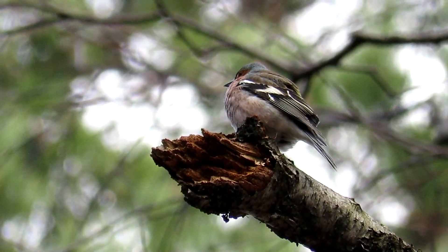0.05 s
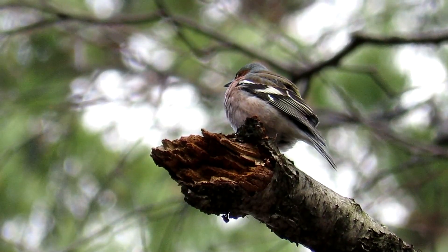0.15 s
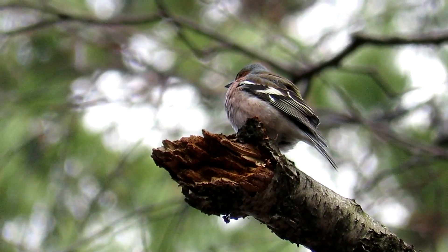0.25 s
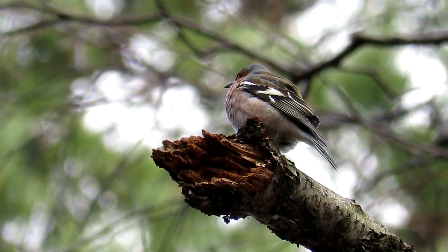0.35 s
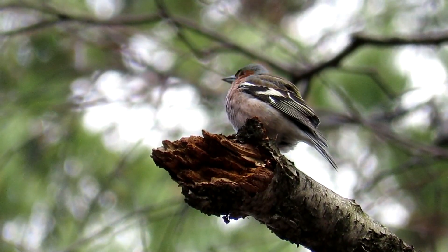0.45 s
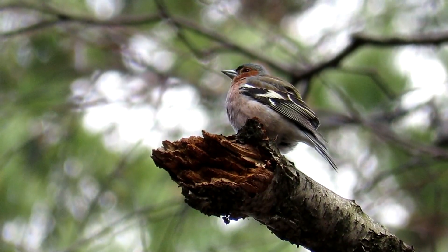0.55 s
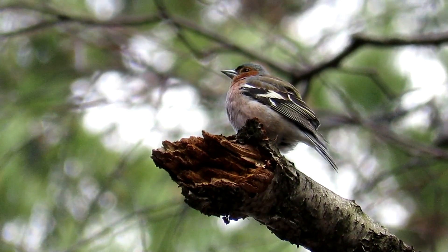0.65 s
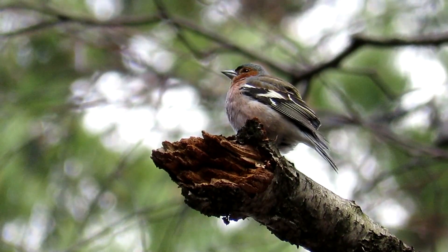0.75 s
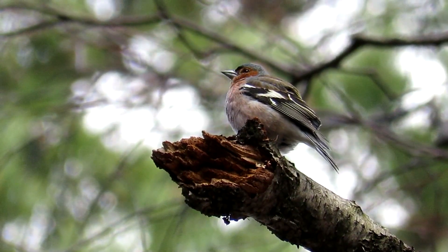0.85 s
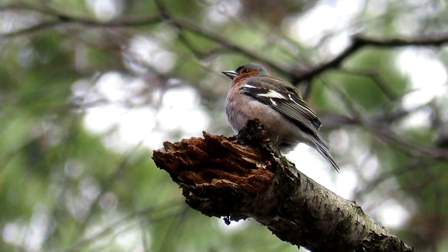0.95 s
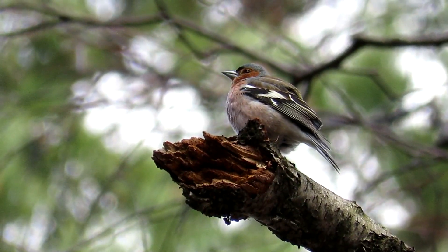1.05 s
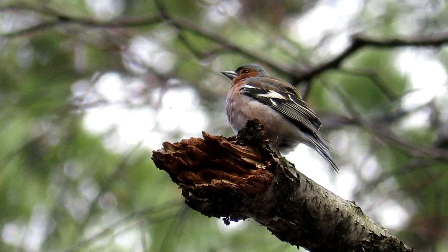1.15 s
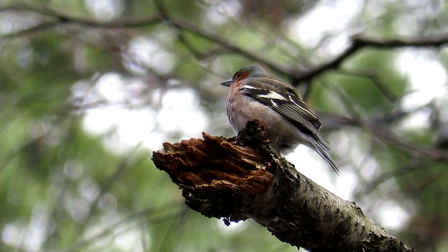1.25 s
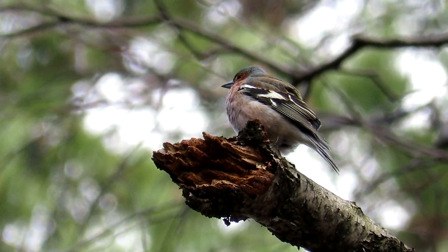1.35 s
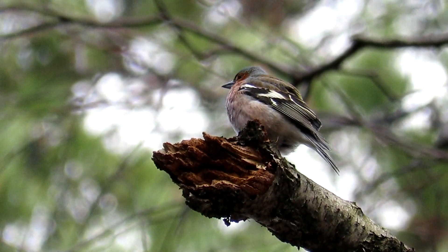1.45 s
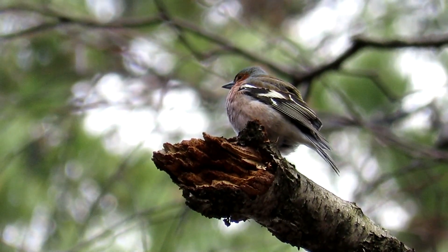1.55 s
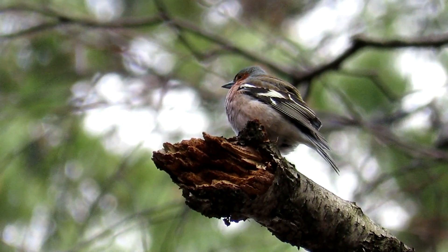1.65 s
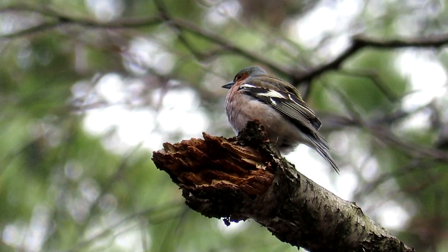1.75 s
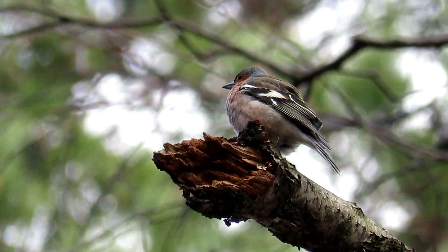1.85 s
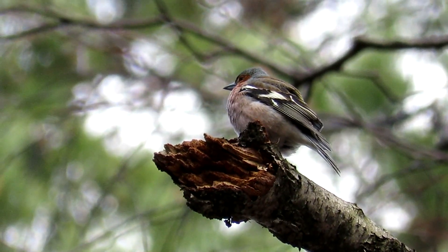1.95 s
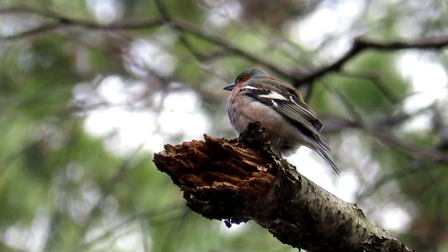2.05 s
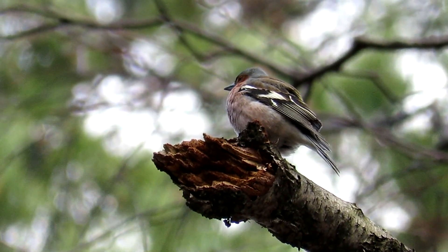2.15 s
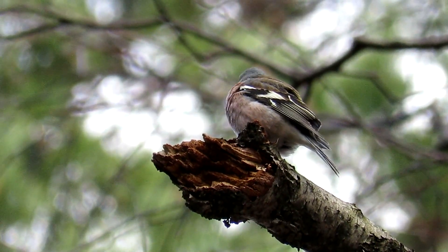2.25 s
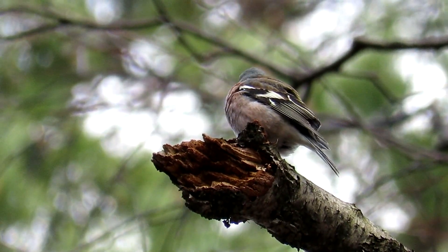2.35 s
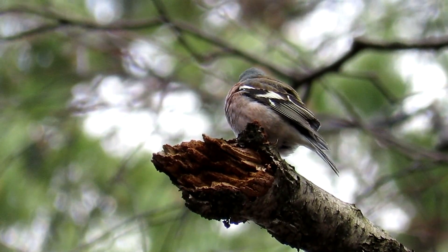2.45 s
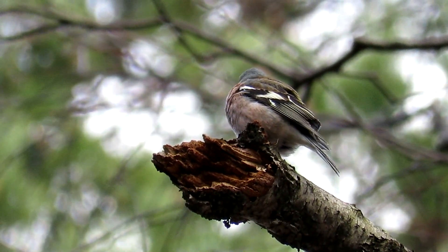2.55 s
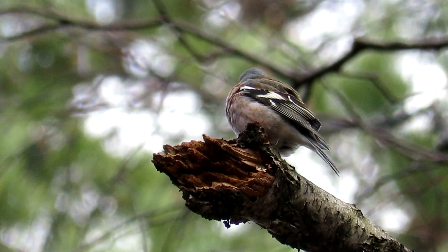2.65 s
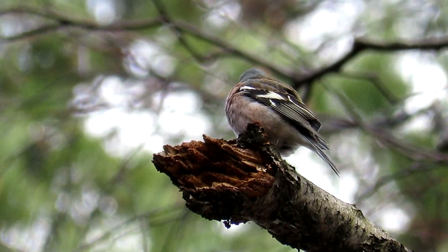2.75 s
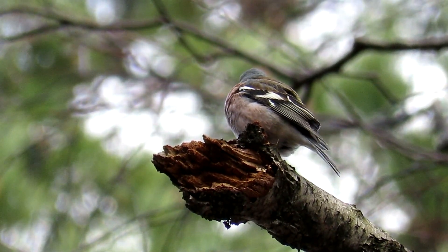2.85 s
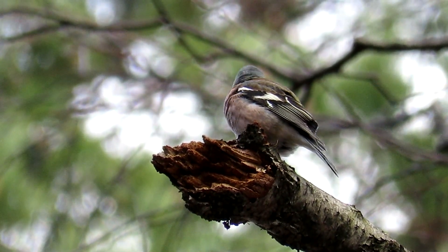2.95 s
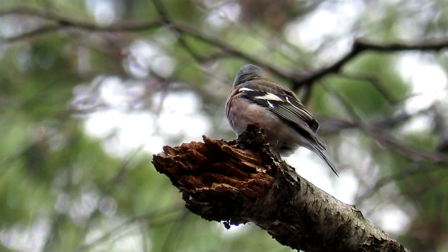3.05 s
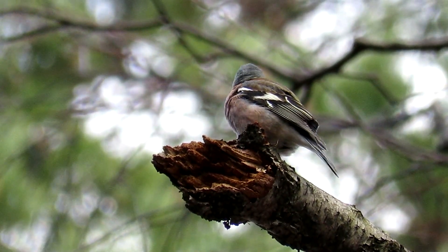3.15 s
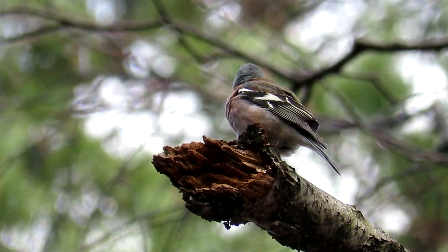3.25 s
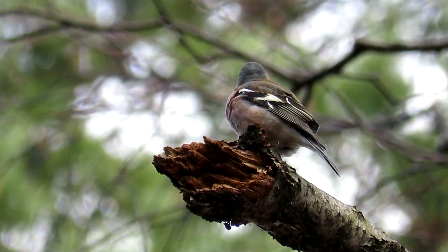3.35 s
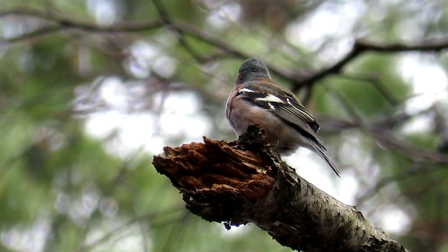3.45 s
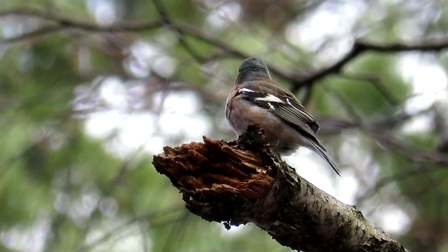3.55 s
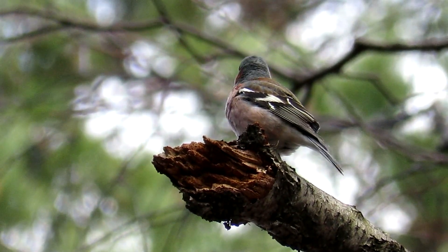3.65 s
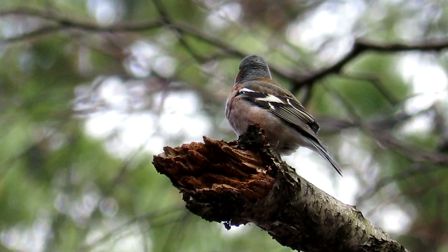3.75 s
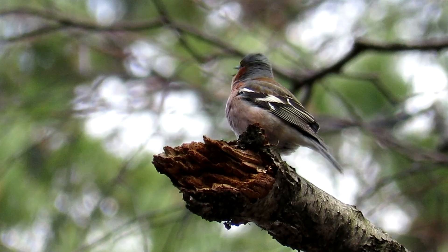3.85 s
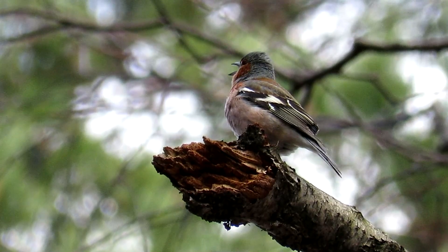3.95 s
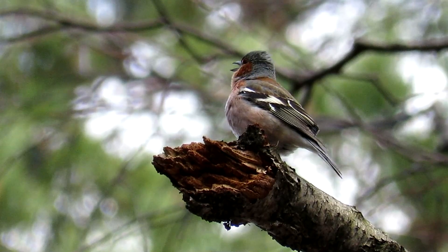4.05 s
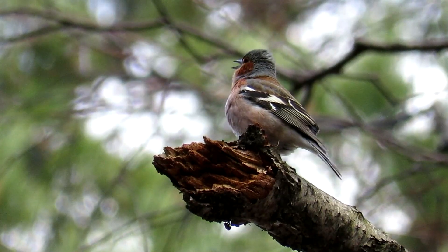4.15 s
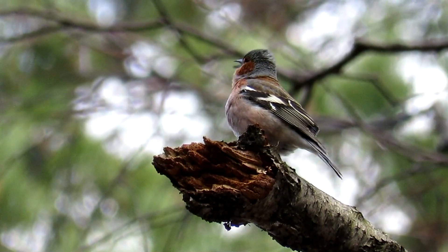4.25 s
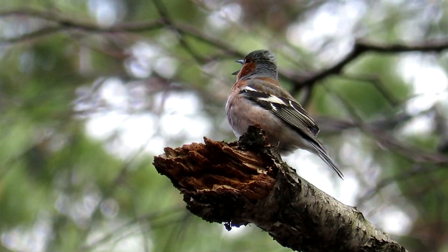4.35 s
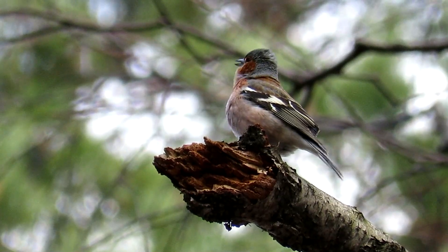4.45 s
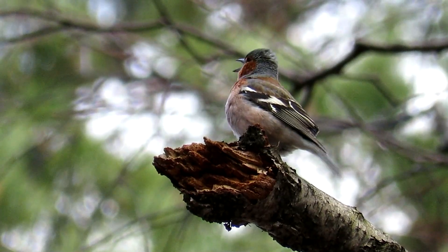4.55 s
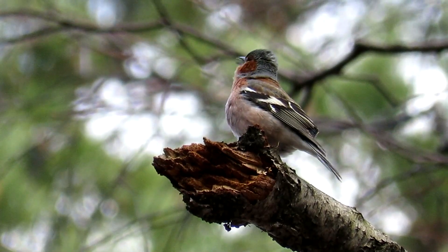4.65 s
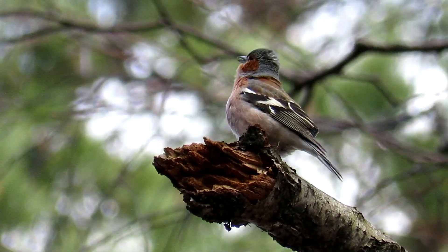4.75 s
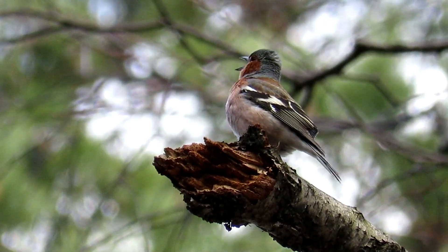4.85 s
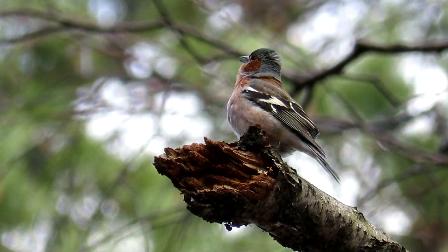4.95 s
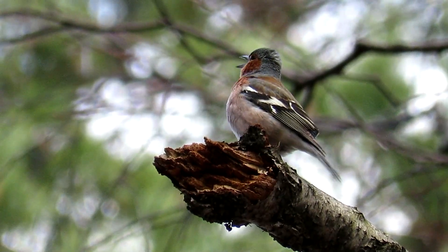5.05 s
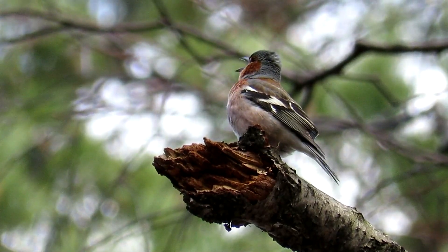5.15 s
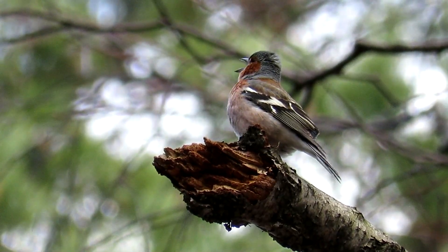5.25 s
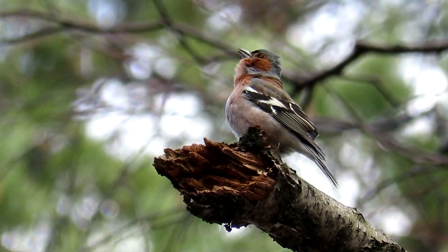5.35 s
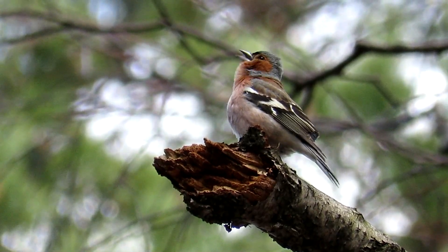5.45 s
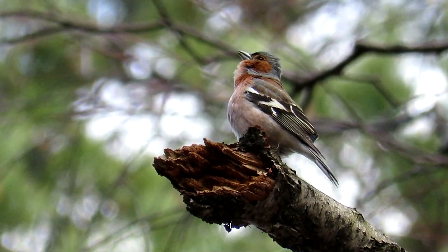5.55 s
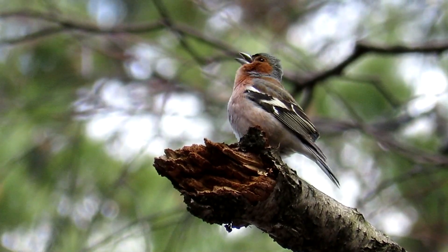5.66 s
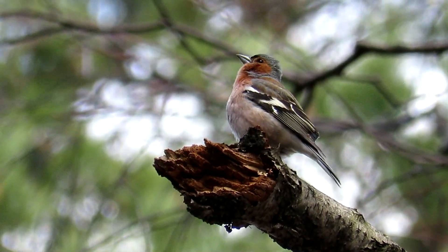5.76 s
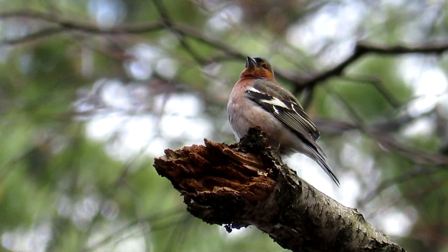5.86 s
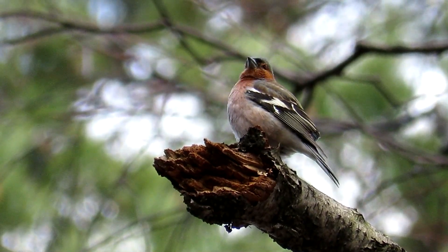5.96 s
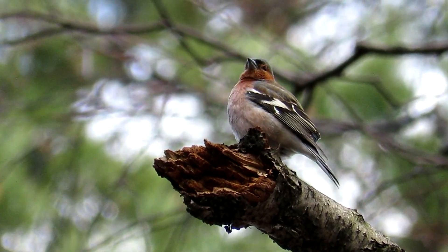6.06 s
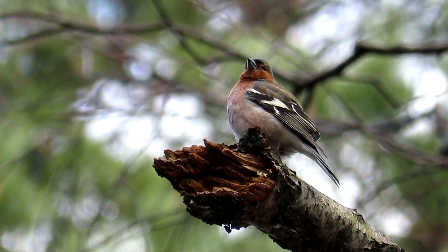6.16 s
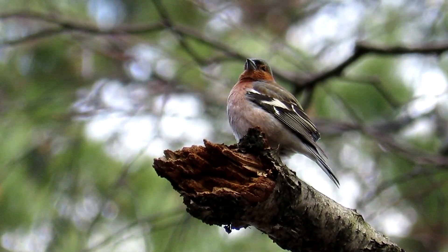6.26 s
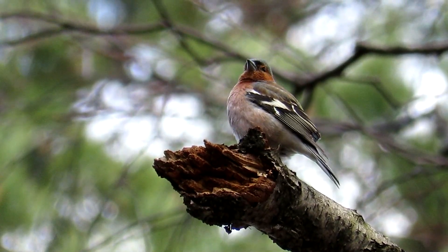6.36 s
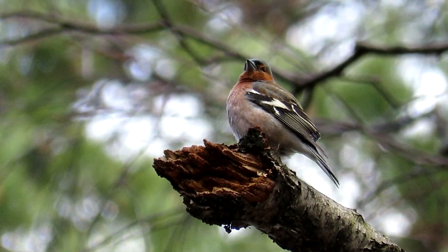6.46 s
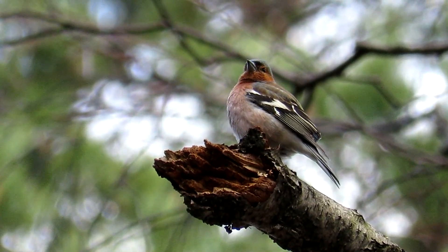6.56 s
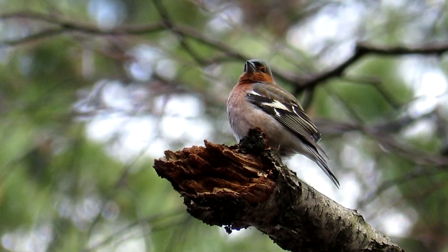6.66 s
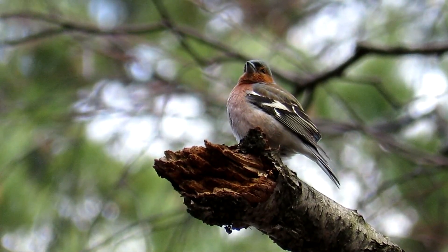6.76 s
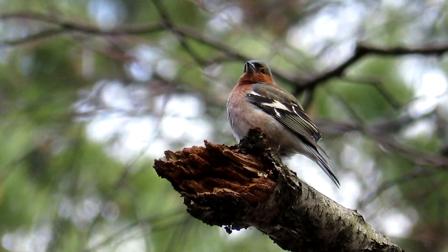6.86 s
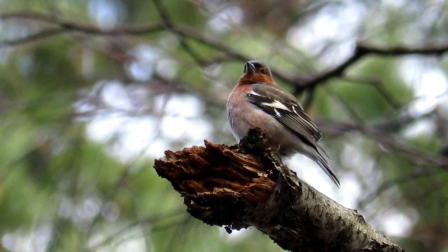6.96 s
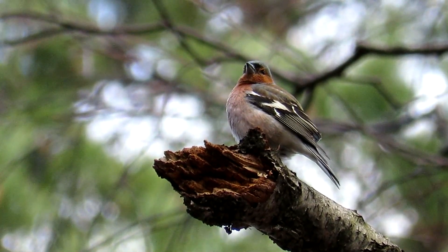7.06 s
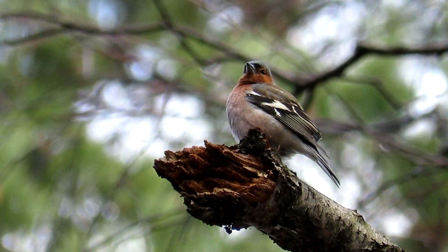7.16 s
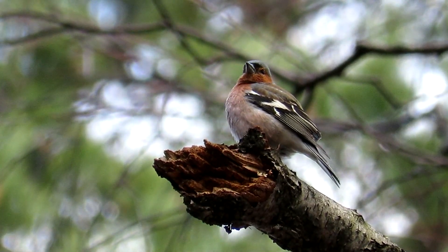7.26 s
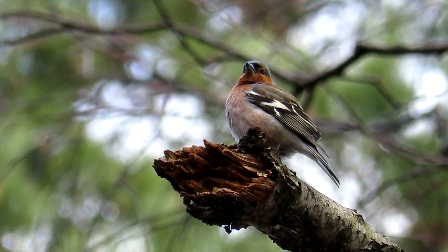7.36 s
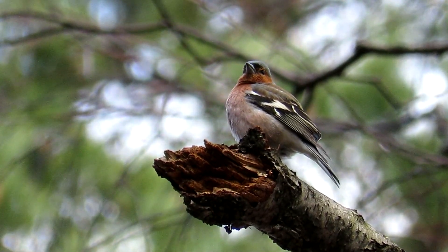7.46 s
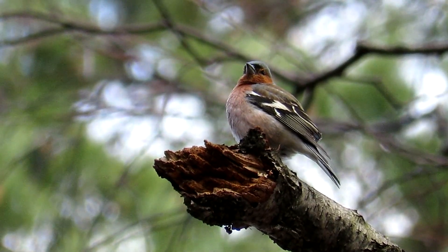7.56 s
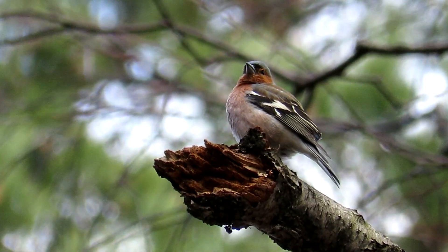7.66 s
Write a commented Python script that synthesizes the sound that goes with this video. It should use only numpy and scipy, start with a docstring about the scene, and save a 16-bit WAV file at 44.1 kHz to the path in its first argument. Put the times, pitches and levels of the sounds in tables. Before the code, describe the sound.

Outdoors in a forest, a low soft rush and light hiss with small dull handling thumps at the start. Faint birds chip, whistle and sweep in nearby trees. Just before the middle, a close chaffinch sings a loud phrase: swelling slurs, a slightly sinking trill, a buzzing flourish. Its notes scatter off the trunks into a short soft tail, leaving sparse distant twitters. Handheld camera microphone, the finch clear and central.

```python
"""First we hear the low rush of a forest, a short faint hum, hiss, thin whistles, a haze of birdsong and
small handling thumps. Then songbirds chip, whistle and sweep; the trunks scatter notes into a soft tail.
A chaffinch on a dead branch sings one phrase: slurs that swell, a trill that sinks a little with each
repeat, and a buzzing flourish. Birds are gliding, nearly pure tones; rush, haze and hiss are shaped noise."""
import sys
import numpy as np
from scipy import signal
from scipy.fft import rfft, irfft, next_fast_len
from scipy.io import wavfile
from scipy.ndimage import uniform_filter1d, map_coordinates

SR = 44100
rng = np.random.default_rng(int(sys.argv[2]) if len(sys.argv) > 2 else 0)


def output_pcm(signal):
    """Save a mono or channel-first signal as 16-bit PCM at the path in sys.argv[1].

    Samples are clipped to [-1, 1] before scaling.
    """
    pcm = np.clip(np.atleast_2d(signal).T, -1, 1) * 32767
    wavfile.write(sys.argv[1], SR, np.round(pcm).astype(np.int16))


N = 339570  # length in samples


def amp(db):
    """Turn decibels into a gain."""
    return 10 ** (np.asarray(db) / 20)


def unit(x):
    """Scale a sound to an average strength (rms) of 1."""
    return x / np.sqrt(np.mean(x ** 2) + 1e-20)


def along(points, hz):
    """Read (f/Hz, value) points at any pitch, evenly by ratio as the ear hears it."""
    f, values = np.transpose(points)
    return np.interp(np.log(hz + 1), np.log(f), values)


def curve(rows):
    """Turn (t/s, value) rows into one value per sample."""
    return np.interp(np.arange(N) / SR, *np.transpose(rows))


def wobble(rate, size):
    """A smooth random curve with `rate` random points a second."""
    knots = rng.standard_normal(int(size * rate / SR) + 4)
    return map_coordinates(knots, [np.arange(size) * rate / SR])


def filtered(x, response):
    """Strengthen, weaken or delay each frequency of x by response(hz)."""
    m = next_fast_len(N + SR // 4)  # spare room, so that delayed sound does not wrap to the start
    hz = np.fft.rfftfreq(m, 1 / SR)
    return irfft(rfft(x, m) * response(hz), m)[..., :N]


def noise(spectrum):
    """Random noise of rms 1, coloured by (f/Hz, level/dB) points."""
    return unit(filtered(rng.standard_normal(N), lambda hz: amp(along(spectrum, hz))))


def wide_noise(spectrum, width):
    """Stereo noise: a shared middle, plus a second noise with opposite sign left and right."""
    mid = noise(spectrum)
    side = filtered(noise(spectrum), lambda hz: amp(along(width, hz)))
    return np.array([mid + side, mid - side])


def patches(x, patchy_db):
    """Narrow bands of a steady noise drift up and down in level by random amounts."""
    z = signal.stft(x, nperseg=1024)[2]
    field = rng.standard_normal(z.shape[-2:])
    field = uniform_filter1d(field, size=4, axis=0)  # smooth over pitch
    field = uniform_filter1d(field, size=10, axis=1)  # smooth over time
    return signal.istft(z * amp(patchy_db * unit(field)), nperseg=1024)[1][..., :N]


# Colour of the forest's rush: (f/Hz, level/dB)
RUSH_COLOUR = [(20, -18), (35, -11.5), (65, -2), (120, -2.5), (250, -2.5), (480, -3.3), (690, -7),
               (770, -6), (825, -.5), (885, -6.5), (1200, -9.7), (1700, -16.5), (2500, -23), (5000, -30.5),
               (15000, -41)]
# How wide the rush spreads: (f/Hz, side-minus-middle level/dB)
RUSH_WIDTH = [(40, -46), (90, -38), (180, -14.5), (350, -12.5), (1400, -10.5), (3000, -9)]


def air(hum_hz=495, hum_db=-53, octave_db=-9, hum_hold_s=.42, hum_fall_db_per_s=120):
    """The forest's rush is patchy noise; a faint wavering tone and its octave hum at first, then die away."""
    rush = unit(patches(wide_noise(RUSH_COLOUR, RUSH_WIDTH), patchy_db=1.16))
    phase = 2 * np.pi * np.cumsum(hum_hz * (1 + .012 * wobble(40, N))) / SR
    level_db = hum_db - hum_fall_db_per_s * np.maximum(np.arange(N) / SR - hum_hold_s, 0)
    hum = np.sin(phase) + amp(octave_db) * np.sin(2 * phase)
    return amp(-43.0) * rush + np.sqrt(2) * amp(level_db) * hum


# Strength of the haze of birdsong, swelling with the finch's lingering echo: (t/s, level/dB)
HAZE_LEVEL = [(0, -54), (1.5, -56.5), (2.4, -51.5), (3.4, -54), (4.2, -47.5), (6.1, -48), (7.1, -51),
              (7.7, -60)]
# Its colour: (f/Hz, level/dB)
HAZE_COLOUR = [(1700, -22), (2050, -7), (2300, -2), (2500, -4.5), (2780, 1), (3080, -4), (3500, -3),
               (3950, -4), (4400, -11), (5200, -24.5)]


def song_haze():
    """A blurred haze of birdsong in drifting patches of pitch, swelling with the finch's lingering echo."""
    return amp(curve(HAZE_LEVEL)) * unit(patches(noise(HAZE_COLOUR), patchy_db=3.5))


# Nudges of the hands on the camera: (t/s, peak level/dB)
HAND_NUDGES = [(.03, -39), (.23, -42.5), (.37, -44), (6.19, -46), (7.15, -48.5)]
# Colour of the camera body's rumble: (f/Hz, level/dB)
RUMBLE_COLOUR = [(25, -30), (50, -14), (63, -7), (77, -2), (92, -14), (160, -24), (400, -70)]
# Colour of the hiss: (f/Hz, level/dB)
HISS_COLOUR = [(200, -15), (2000, -8.5), (5000, 2), (8000, 0.5), (15500, -1)]
# How wide the hiss spreads: (f/Hz, side-minus-middle level/dB)
HISS_SPREAD = [(2500, 7), (4500, -1.5), (7000, -0.5)]


def camera(whine_hz=15106, whine_db=-74, hiss_db=-53.0, rise_db_per_s=200, fall_db_per_s=60):
    """Each nudge makes the body rumble briefly; under it, amplifier hiss and a thin electronic whine."""
    t = np.arange(N) / SR
    handling = np.zeros(N)
    for s, db in HAND_NUDGES:
        below_peak_db = np.maximum(rise_db_per_s * (s - t), fall_db_per_s * (t - s))
        handling += amp(db - below_peak_db)
    hiss = amp(hiss_db) * wide_noise(HISS_COLOUR, HISS_SPREAD)
    whine = np.sqrt(2) * amp(whine_db) * np.sin(2 * np.pi * whine_hz * t)
    return handling * noise(RUMBLE_COLOUR) + hiss + whine


def add(track, s, sound):
    """Mix a sound into a track at time s, in seconds."""
    part = track[max(round(s * SR), 0):][:len(sound)]
    part += sound[:len(part)]  # this also changes the track


def syrinx(hz, db, jitter=0.0081, overtone_db=-41.5, edge_s=0.0015):
    """The bird's voice organ: a nearly pure whistle, slightly unsteady in pitch, with a weak octave."""
    n = len(hz)
    phase = 2 * np.pi * np.cumsum(hz * (1 + jitter * wobble(413, n))) / SR
    samples_from_end = np.minimum(np.arange(n), np.arange(n)[::-1])
    gate = np.sin(np.clip(samples_from_end / (edge_s * SR), 0, 1) * np.pi / 2) ** 2  # soft start and stop
    return np.sqrt(2) * amp(db) * gate * (np.sin(phase) + amp(overtone_db) * np.sin(2 * phase))


def glides(notes, bend, jitter, flicker_db, ends_db=-8):
    """Notes (t/s, length/s, start f/Hz, end f/Hz, level/dB) swell and fade; bend above 1 flattens their low end."""
    song = np.zeros(N)
    for s, length, start_hz, end_hz, db in notes:
        u = np.linspace(0, 1, int(length * SR))  # progress through the note
        height = u if end_hz > start_hz else 1 - u
        hz = min(start_hz, end_hz) + abs(end_hz - start_hz) * height ** bend
        swell_db = ends_db * (2 * u - 1) ** 2 + flicker_db * wobble(95, len(u))
        add(song, s, syrinx(hz, db + swell_db, jitter=jitter))
    return song


# All levels in the next four tables are before the final mix.
# Thin held whistles that sag a little: (t/s, length/s, start f/Hz, level/dB)
HELD_WHISTLES = [(.01, .086, 4150, -52.5), (.8, .08, 4200, -52), (1.005, .056, 5160, -49),
                 (6.79, .165, 4900, -49.5), (7.08, .11, 4230, -53), (7.23, .127, 4660, -47),
                 (7.53, .16, 4000, -55)]
# Chips, one quick fall in pitch each: (t/s, start f/Hz, level/dB)
QUICK_CHIPS = [(1.534, 4320, -47.5), (3.164, 4120, -39), (3.358, 6150, -47.5), (3.533, 6250, -40),
               (6.08, 4280, -44)]
# Sweeps, with one short loud rise at 5.248 s from the finch's own second voice:
# (t/s, length/s, start f/Hz, end f/Hz, level/dB)
SINGLE_SWEEPS = [ (1.853, .017, 3830, 4280, -49), (1.88, .085, 4450, 2880, -43.5),
                 (4.298, .005, 4700, 6600, -44), (4.306, .004, 6300, 4660, -41),
                 (5.058, .025, 3950, 4170, -27), (5.17, .03, 4000, 4450, -32),
                 (5.21, .038, 4000, 4400, -29), (5.248, .016, 3720, 3960, -22.5),
                 (6.18, .014, 3650, 4650, -38), (6.263, .009, 3600, 5000, -42),
                 (6.327, .044, 6100, 3100, -49), (6.379, .036, 5400, 3400, -41),
                 (6.414, .032, 3550, 4750, -37.5), (6.508, .053, 3730, 5180, -49.5),
                 (6.664, .014, 4450, 3350, -47), (6.744, .039, 4600, 4370, -46.5),
                 (7.045, .008, 3600, 4500, -42), (7.205, .035, 4250, 4750, -54), ]
# An up-down motif: (t/s into the motif, length/s, start f/Hz, end f/Hz, level/dB at its first playing)
UP_DOWN_MOTIF = [(0, .036, 2650, 3330, -46), (.05, .05, 4900, 2560, -46)]


def whistles_chips_and_sweeps(count=3):
    """Gliding tones of birds in nearby trees, a motif that grows louder, and one note of the finch's second voice."""
    whistle_sag = .045  # share of the pitch lost
    chip_s, chip_fall_hz = .031, 820
    motif_start_s, motif_period_s, motif_growth_db = 2.056, .183, 1.5
    held = [(s, length, hz, hz * (1 - whistle_sag), db) for s, length, hz, db in HELD_WHISTLES]
    chips = [(s, chip_s, hz, hz - chip_fall_hz, db) for s, hz, db in QUICK_CHIPS]
    motifs = []
    for k in range(count):
        for s, length, start_hz, end_hz, db in UP_DOWN_MOTIF:
            start_s = motif_start_s + k * motif_period_s + s
            motifs.append((start_s, length, start_hz, end_hz, db + k * motif_growth_db))
    return (glides(chips, bend=1.7, jitter=.008, flicker_db=2)
            + glides(motifs + SINGLE_SWEEPS, bend=1.4, jitter=.0086, flicker_db=2.5)
            + glides(held, bend=.7, jitter=.004, flicker_db=2))


# Reflections from the limbs: (delay t/s, level/dB before the final mix)
LIMB_ECHOES = [(.0031, -22.5), (.0067, -20), (.0091, -13), (.0133, -13.5), (.0203, -16), (.0368, -17.5)]


def branches(x):
    """Weak early copies from the limbs around the perch, each a little late."""
    return filtered(x, lambda hz: sum(amp(db) * np.exp(-2j * np.pi * hz * s) for s, db in LIMB_ECHOES))


# How long the wood's echo lasts: (f/Hz, t/s to fall by 60 dB)
ECHO_TIMES = [(1500, .6), (2400, 0.71), (3500, 1.0), (5000, 0.7), (7000, 0.51)]


def forest(x, build_s, side_db=-24):
    """Scatter from many trunks: a tail of noise that builds up, then dies at its own speed at each pitch."""
    hz, t, z = signal.stft(rng.standard_normal((2, SR)), SR, nperseg=256)
    decay = amp(-60 * t / along(ECHO_TIMES, hz)[:, None])
    tail = signal.istft(z * decay, SR, nperseg=256)[1]
    tail = tail * (1 - np.exp(-np.arange(tail.shape[1]) / SR / build_s))
    tail = tail / np.linalg.norm(tail[0])
    mid, side = signal.fftconvolve(x[None], tail, axes=1)[:, :N]
    return np.array([mid + amp(side_db) * side, mid - amp(side_db) * side])


# Notes from deep in the trees: (t/s, length/s, start f/Hz, end f/Hz, level/dB before the final mix)
DEEP_NOTES = [ (1.578, .035, 3680, 3820, -45), (1.63, .1, 4000, 4850, -52.5), (2.59, .038, 4700, 5130, -53),
              (2.77, .19, 3400, 2200, -48.5), (3.0, .1, 2850, 3850, -51.5), (3.64, .14, 7800, 5750, -45.5),
              (5.815, .02, 5600, 8400, -51), (5.925, .035, 4600, 5050, -49), ]


def far_birds(count=3):
    """Unsteady notes from deep in the wood, and a twitter of high falling notes, unevenly pitched."""
    start_s, period_s, length_s, level_db = 6.03, .295, .07, -56
    fall = .22  # share of the pitch lost
    pitches = 8400 * np.exp(.03 * rng.standard_normal(count))  # Hz
    twitter = [(start_s + k * period_s, length_s, hz, hz * (1 - fall), level_db)
               for k, hz in enumerate(pitches)]
    return glides(DEEP_NOTES + twitter, bend=1, jitter=.0295, flicker_db=3.5)


def gesture(rows, stretch=1):
    """Turn (t/s, value, ...) rows into smooth curves: muscles round off the corners."""
    s, *cols = np.transpose(rows)
    s = np.maximum.accumulate(s - s[0]) * stretch
    t = np.arange(int(s[-1] * SR)) / SR
    return [uniform_filter1d(np.interp(t, s, c), size=130, mode="nearest") for c in cols]


def trembling(hz, db, depth, rate, pulsing_db, uneven_db):
    """A fast flutter of the syrinx swings pitch and strength, each cycle a little different."""
    n = len(hz)
    uneven_rate = rate * (1 + .018 * uneven_db * wobble(90, n))
    warble = np.sin(2 * np.pi * np.cumsum(uneven_rate) / SR)
    flutter_db = pulsing_db * warble + uneven_db * wobble(171.5, n)
    flutter = unit(amp(np.minimum(depth / 400, 1) * flutter_db))  # only warbled stretches pulse
    return flutter * syrinx(hz + depth * warble, db)


# Runs of one syllable: (t/s, syllable, repeats, period t/s, level/dB before the final mix,
# growth/dB per repeat, pitch factor, length factor)
SYLLABLE_RUNS = [ (3.647, "rise", 3, .2215, -32.3, 5.1, 1.005, .95),
                 (3.723, "slur", 3, .2165, -25.3, 2.6, .985, .99),
                 (4.318, "dip", 1, 0, -22.7, 0, 1.06, .86), (4.393, "arch", 1, 0, -21, 0, 1.056, .96),
                 (4.492, "spike", 3, .2485, -27, 1.4, 1.015, 1),
                 (4.554, "dip", 3, .2485, -19.2, .2, 1.035, .99),
                 (4.637, "arch", 3, .249, -18.2, 0, 1.046, .98), ]
# Shape of each syllable before its run's factors: (t/s from its start, f/Hz, level/dB relative to its run)
SYLLABLE_SHAPES = { "rise": [(0, 3020, -18), (.006, 3243, -12), (.011, 3580, .5), (.023, 4300, -7),
                   (.036, 5000, -17)], "slur": [(0, 6600, -31), (.032, 4700, -24), (.038, 4300, -8),
                   (.05, 3690, -2), (.065, 3350, -.5), (.08, 3200, -12)], "spike": [(0, 5270, -7),
                   (.012, 4680, -12.5), (.021, 3926, 3), (.029, 4320, -9.5), (.044, 5400, -.5),
                   (.048, 7240, -22), (.053, 4870, -1)], "dip": [(0, 3600, -6), (.005, 3438, 0),
                   (.015, 2855, .3), (.032, 2400, -9.5), (.044, 2748, -10.5), (.054, 3430, 1),
                   (.062, 3790, -3.5), (.068, 3870, -10)], "arch": [(0, 1840, -20.5), (.012, 2346, -2),
                   (.023, 2953, 0), (.032, 3140, .5), (.042, 2900, 1.5), (.051, 2190, -11),
                   (.057, 1351, -17.5)], }
# Pitch swing at the middle of each syllable: (name: swing f/Hz)
SYLLABLE_WARBLE = {"rise": 90, "slur": 50, "spike": 280, "dip": 440, "arch": 30}
# The closing flourish, one table a note: (t/s, f/Hz, level/dB before the final mix)
FLOURISH_NOTES = [
    [(5.247, 6300, -45), (5.258, 5800, -32), (5.272, 5400, -31), (5.286, 4850, -36)],
    [(5.288, 3750, -25.5), (5.33, 3770, -23.3), (5.36, 3720, -27), (5.41, 3850, -24), (5.45, 3950, -31.5)],
    [(5.497, 3480, -29), (5.513, 3100, -21), (5.535, 2154, -23), (5.556, 1947, -31), (5.572, 2470, -22),
     (5.586, 3030, -21), (5.61, 3290, -18), (5.635, 3250, -20.5), (5.651, 2745, -19), (5.667, 2135, -26),
     (5.728, 2014, -29), (5.742, 1740, -41)],
    [(5.803, 2530, -41), (5.809, 3160, -29.5), (5.83, 4100, -43), (5.838, 3420, -27), (5.843, 1900, -32)],
]
# How unevenly each note of the flourish pulses: (level/dB)
FLOURISH_RASP = [4, 5, 2, 2.5]
# Low notes flutter more slowly: (f/Hz of the note, warbles per second)
FLUTTER_RATE = [(2000, 112), (2500, 162), (3300, 173), (5500, 185)]


def finch(warble_rate=165):
    """Runs of repeated syllables, then notes whose fast pitch warble makes them buzz."""
    pitch_loss, length_loss = .019, .018  # each repeat is lower and shorter by these shares
    buzz_depth = .116  # swing of the flourish, as a share of the pitch
    song = np.zeros(N)
    for s, name, repeats, period, db, growth_db, pitch, stretch in SYLLABLE_RUNS:
        for k in range(round(repeats)):
            hz, shape_db = gesture(SYLLABLE_SHAPES[name], stretch * (1 - length_loss * k))
            hz = hz * pitch * (1 - pitch_loss * k)
            level_db = db + growth_db * k + shape_db
            depth = SYLLABLE_WARBLE[name] * np.hanning(len(hz))
            note = trembling(hz, level_db, depth, warble_rate, pulsing_db=3, uneven_db=1.8)
            add(song, s + k * period, note)
    for rows, rasp_db in zip(FLOURISH_NOTES, FLOURISH_RASP):
        hz, db = gesture(rows)
        rate = along(FLUTTER_RATE, hz)
        note = trembling(hz, db, buzz_depth * hz, rate, pulsing_db=3, uneven_db=rasp_db)
        add(song, rows[0][0], note)
    return song


# The beak swings towards the camera, away from the trees: (t/s, level/dB of the song sent to the echoes)
BEAK_TURN = [(5.4, 2), (5.6, -2.5), (5.8, -1)]


def scene():
    """Birdsong over the forest's rush; each layer of notes has its own mix of direct sound and echo."""
    song, around, far = finch(), whistles_chips_and_sweeps(), far_birds()
    outward = song * amp(curve(BEAK_TURN))  # the part of the song that goes out into the trees
    near = amp(-1.1) * song + branches(outward) + amp(-8.8) * forest(outward, build_s=.009, side_db=-60)
    middle = amp(-1.6) * around + amp(-.5) * branches(around) + amp(-8) * forest(around, build_s=.0057)
    distant = amp(-3.5) * far + amp(-3) * forest(far, build_s=.004)
    return near + middle + distant + song_haze() + air() + camera()


def record(dry, top_hz=15750):
    """The camera keeps nothing from its band limit upwards."""
    return filtered(dry, lambda hz: hz < top_hz)


dry = scene()
out = record(dry)
output_pcm(out)
```